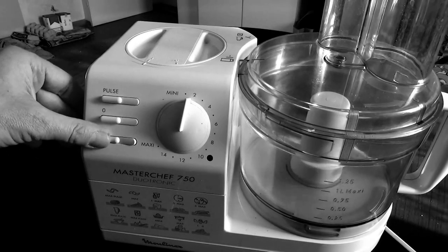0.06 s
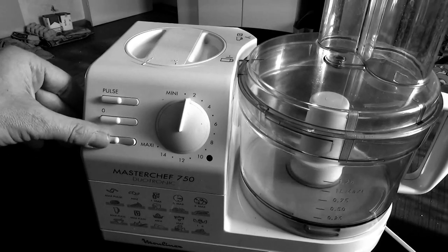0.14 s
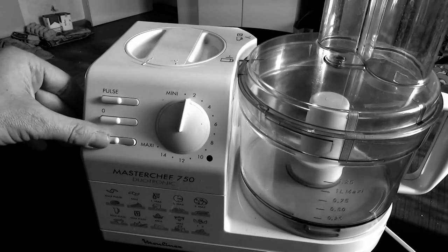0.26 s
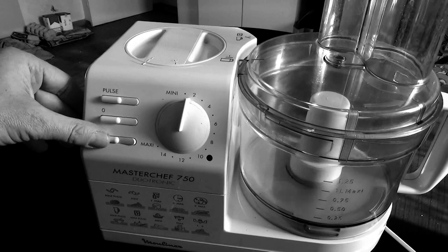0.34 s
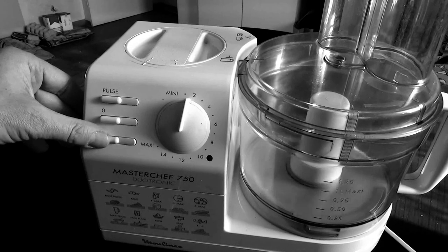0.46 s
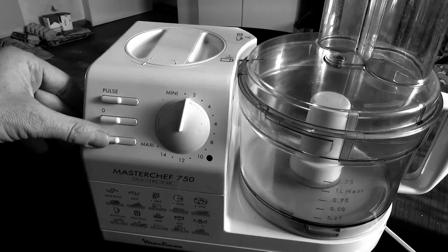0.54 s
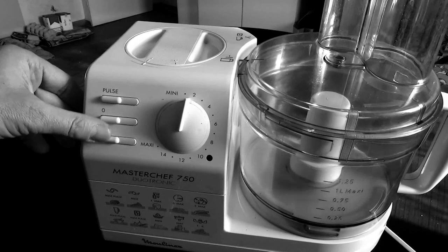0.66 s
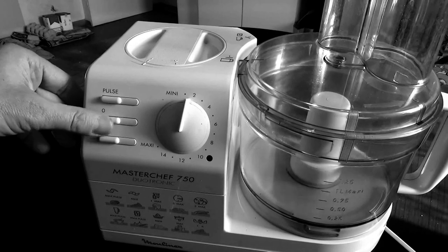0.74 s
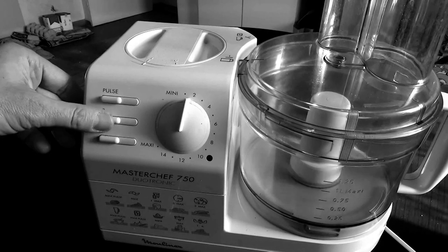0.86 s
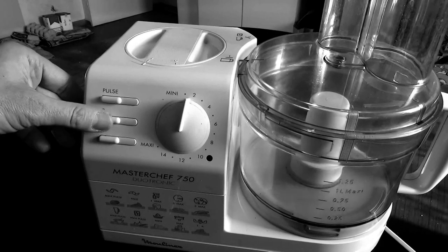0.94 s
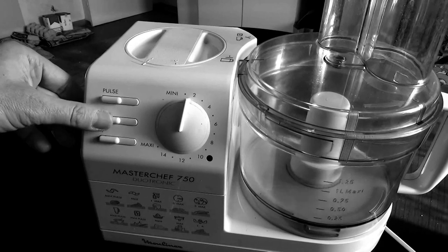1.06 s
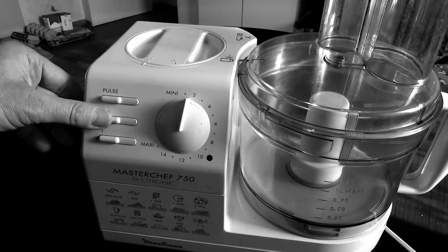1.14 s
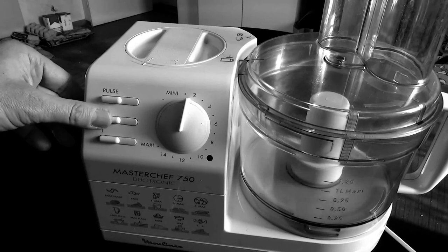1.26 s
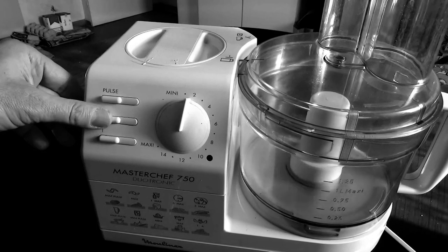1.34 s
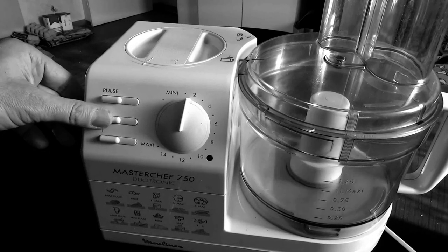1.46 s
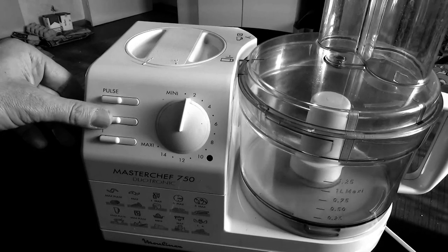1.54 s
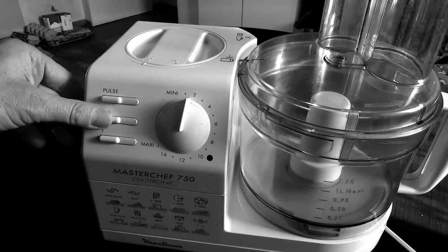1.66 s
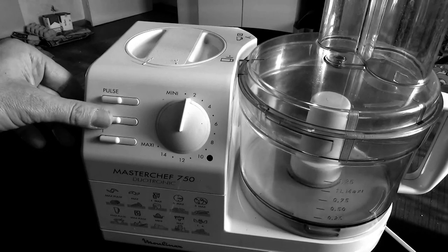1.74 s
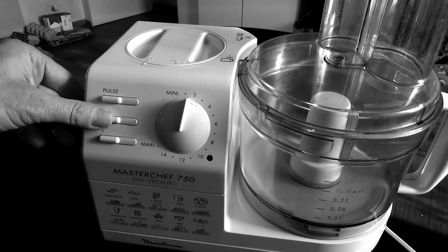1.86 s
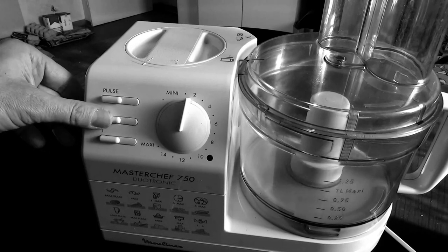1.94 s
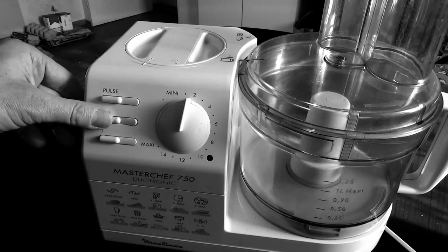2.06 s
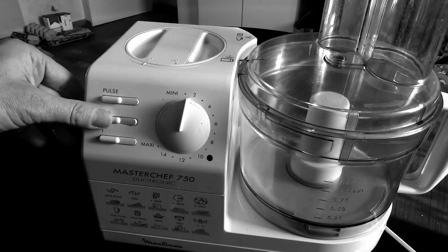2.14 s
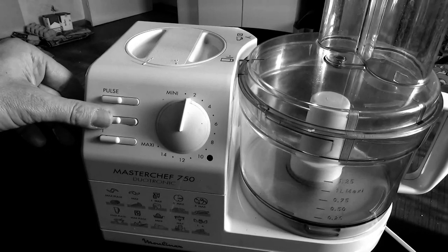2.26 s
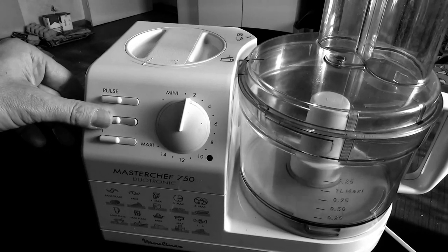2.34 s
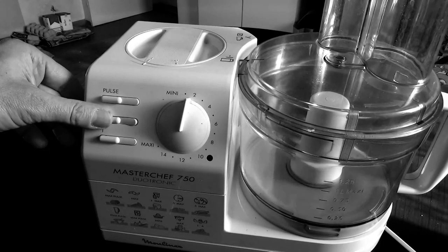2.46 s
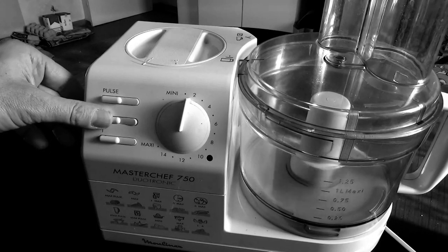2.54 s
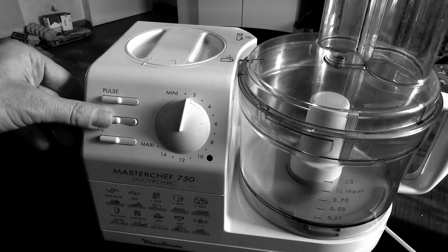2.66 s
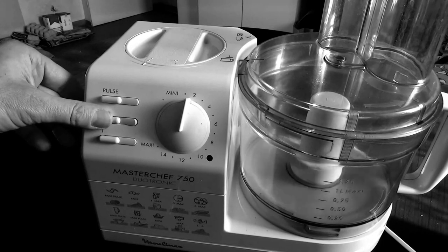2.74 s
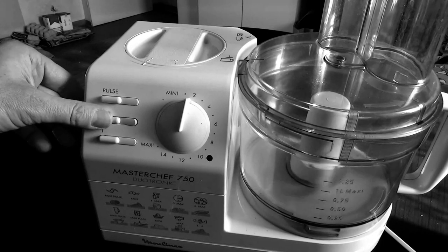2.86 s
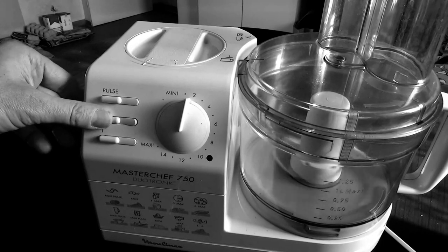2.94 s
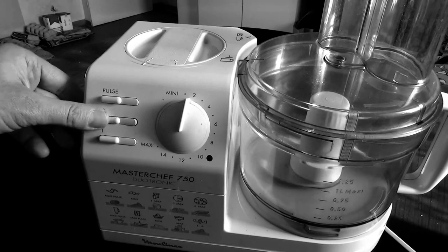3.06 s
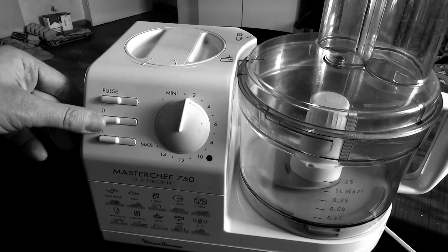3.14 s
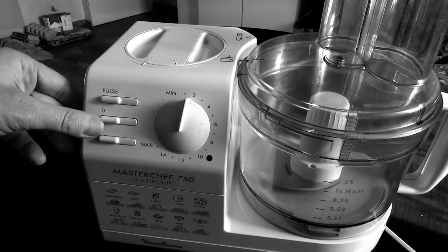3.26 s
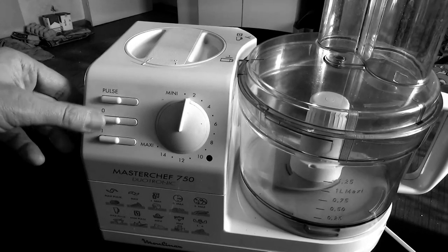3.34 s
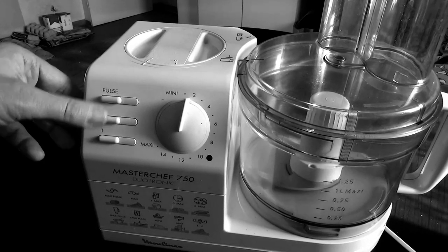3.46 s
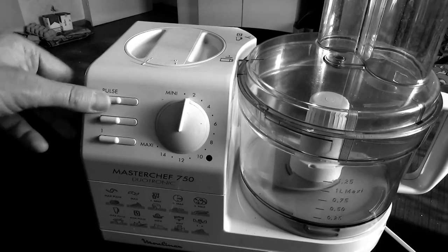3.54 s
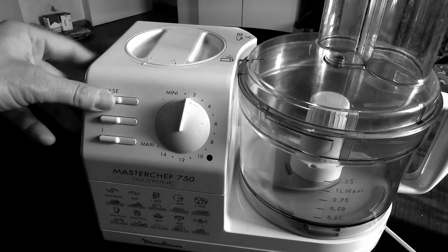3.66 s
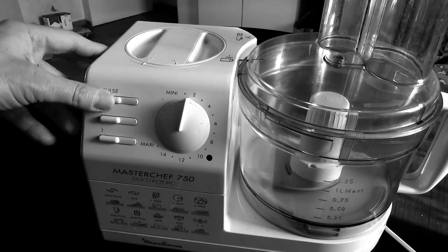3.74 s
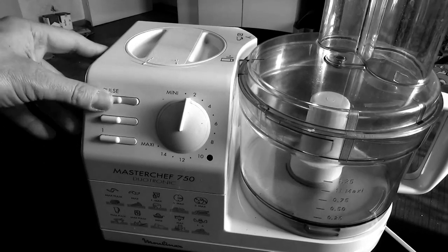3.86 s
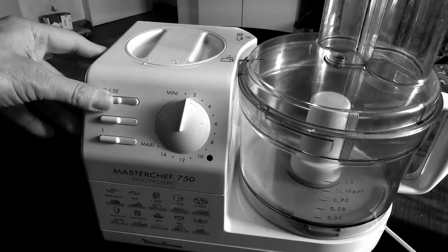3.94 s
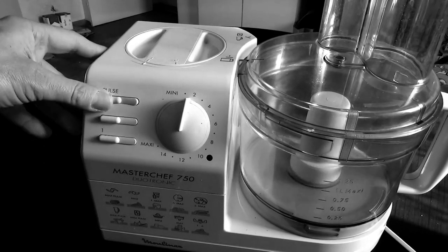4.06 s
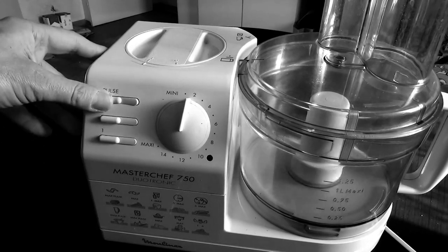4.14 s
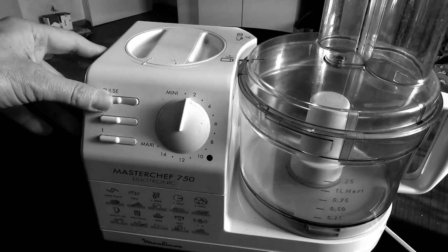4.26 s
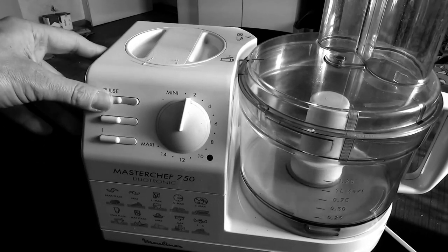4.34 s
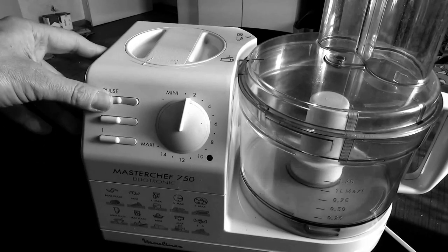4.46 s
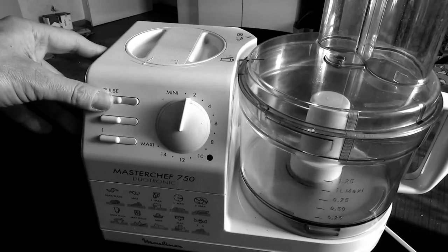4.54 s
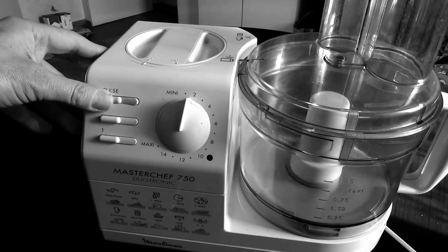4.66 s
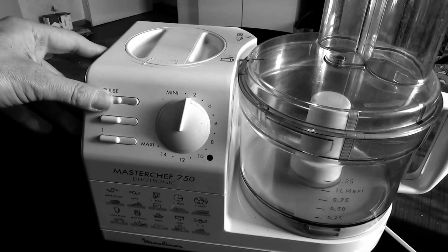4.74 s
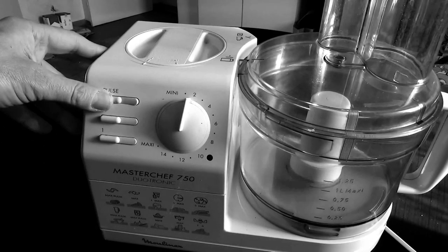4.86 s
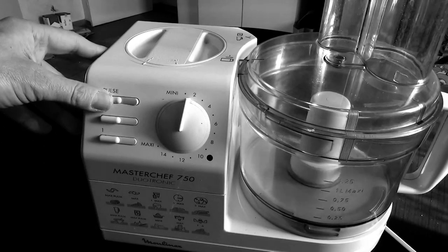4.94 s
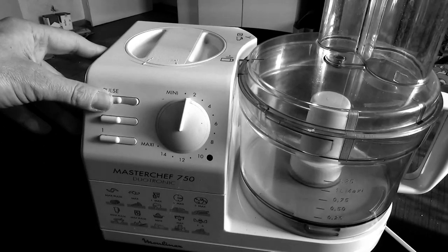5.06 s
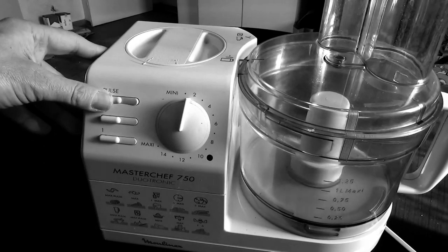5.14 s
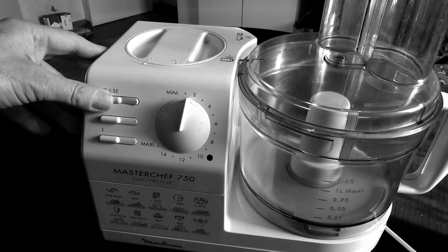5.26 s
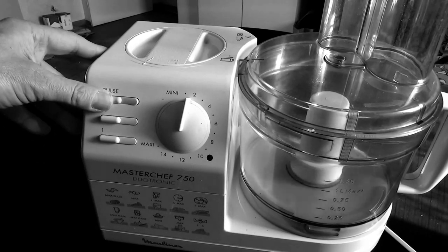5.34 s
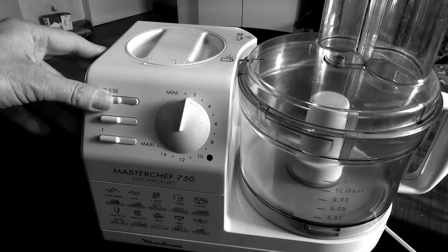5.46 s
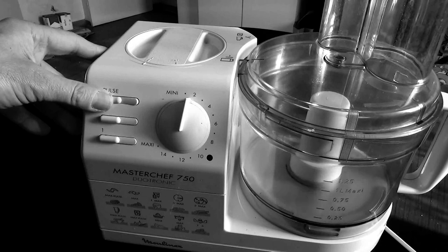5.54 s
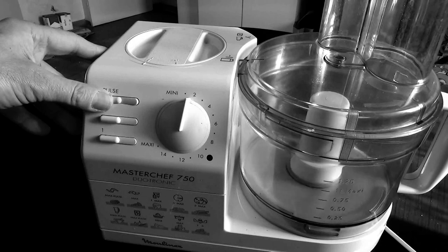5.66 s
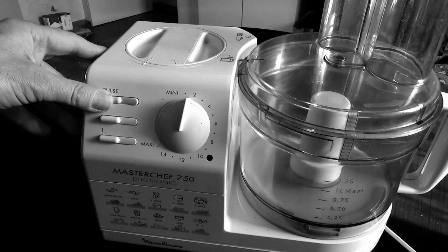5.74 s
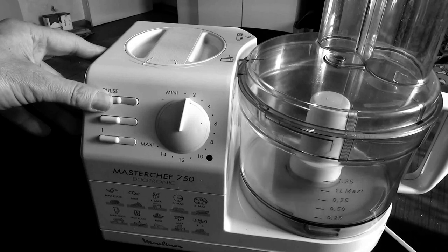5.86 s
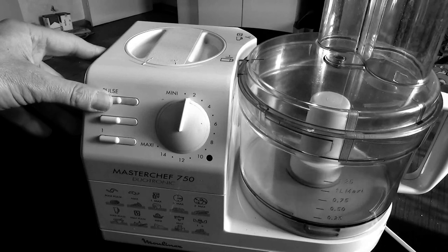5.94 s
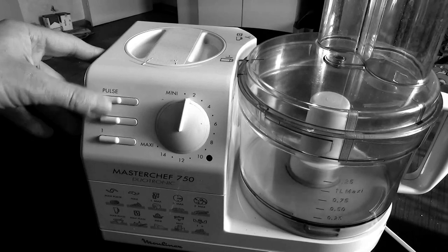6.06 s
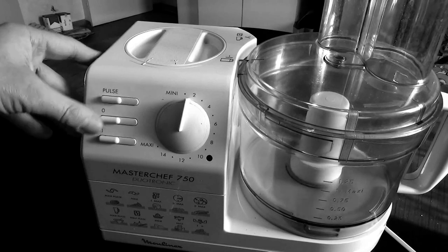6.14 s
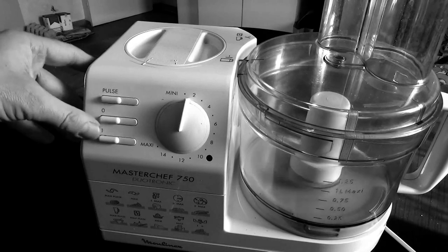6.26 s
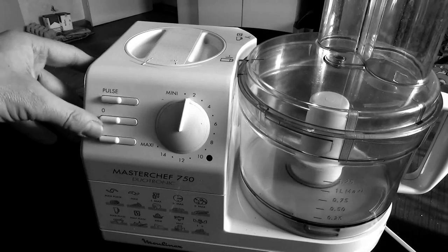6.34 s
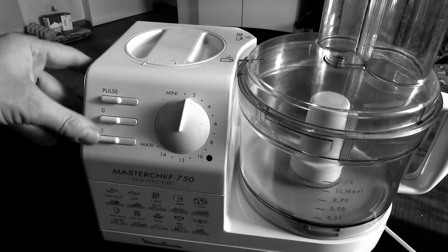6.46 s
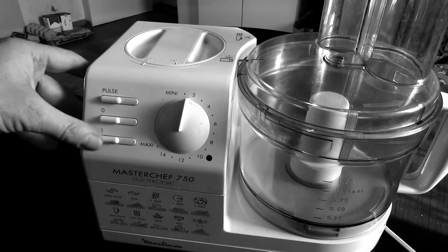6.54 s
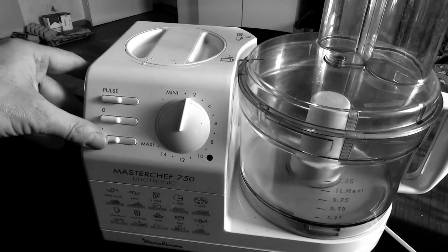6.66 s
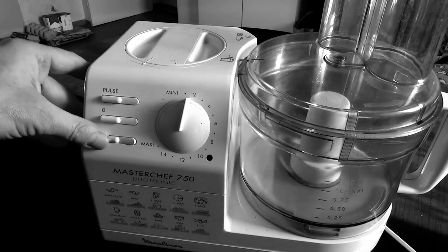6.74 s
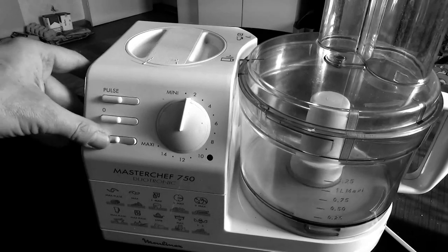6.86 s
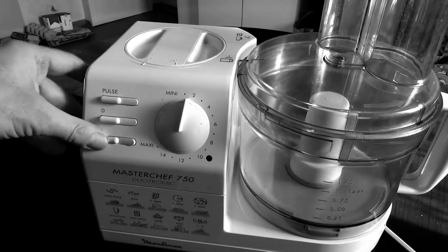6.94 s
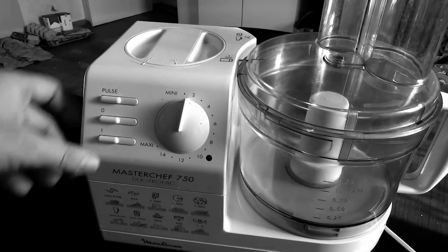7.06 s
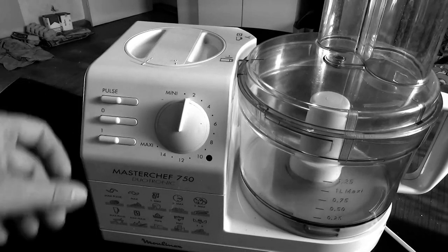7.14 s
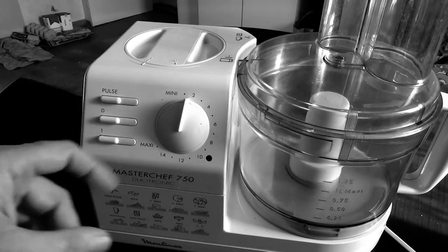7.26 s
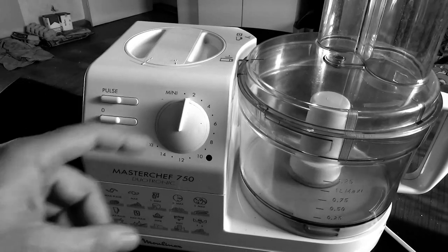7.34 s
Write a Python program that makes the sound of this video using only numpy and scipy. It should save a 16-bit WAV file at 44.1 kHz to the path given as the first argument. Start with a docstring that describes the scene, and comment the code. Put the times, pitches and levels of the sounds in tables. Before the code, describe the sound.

An empty food processor buzzes in three bursts, with switch clicks, clattering starts and a falling whine in between.

```python
"""On a kitchen counter, an empty food processor runs, is switched off and coasts to rest. A thumb
presses the button: it runs for two seconds, coasts briefly and is started again. Pulses of mains
current shake the plastic housing and rattle the drive, while the motor's carbon brushes hiss and
whine with the rotor (its spinning part). Every start slams the slack drive into a clatter;
without power the whine glides down. The switch snaps on and off."""
import sys
import numpy as np
from scipy import signal
from scipy.fft import rfft, irfft, next_fast_len
from scipy.io import wavfile
from scipy.ndimage import uniform_filter1d

SR = 44100
rng = np.random.default_rng(int(sys.argv[2]) if len(sys.argv) > 2 else 0)


def to_wav(sig):
    """Store sig (one row per channel, or 1-D mono) as 16-bit WAV at the path in sys.argv[1].

    Samples outside -1..1 are clipped; the rate is SR.
    """
    pcm = np.clip(np.atleast_2d(sig), -1, 1) * 32767
    pcm = np.round(pcm).astype(np.int16)
    wavfile.write(sys.argv[1], SR, pcm.T)  # frames by channels


N = 326340
TIME = np.arange(N) / SR
MAINS_HZ, FULL_TURNS_PER_S, COMMUTATOR_BARS = 50, 152.5, 18


def from_db(db):
    """Turn decibels into a gain to multiply by."""
    return 10 ** (np.asarray(db) / 20)


def rms_one(x):
    """Scale a signal to an average power of 1."""
    return x / np.sqrt(np.mean(x ** 2) + 1e-20)


def at_hz(spectrum, hz):
    """Read a spectrum between its points, on a scale of octaves."""
    f, db = np.transpose(spectrum)
    return np.interp(np.log(np.maximum(hz, 1)), np.log(f), db)


def drift(rate):
    """A smooth random wobble of size about 1 that changes about `rate` times a second."""
    pole = np.exp(-40 * np.pi * rate / SR)
    noise = rng.standard_normal(N // 20 + 4002)
    slow = signal.lfilter([1], [1, -2 * pole, pole * pole], noise)[4000:]
    return np.interp(np.arange(N) / 20, np.arange(len(slow)), rms_one(slow))


def response(spectrum, modes, hz):
    """Gain of a broad spectrum with peaks at its modes, the pitches where a part rings."""
    peaks = sum(from_db(db) ** 2 / (1 + (2 * (hz - f) / width) ** 2) ** 2 for f, width, db in modes)
    return from_db(at_hz(spectrum, hz)) * np.sqrt(1 + peaks)


def colour(x, spectrum, modes=()):
    """Give a sound the tone colour of a part; only the spectrum's shape counts, not its overall level."""
    size = 2 * next_fast_len(N // 2 + SR // 4)
    hz = np.arange(size // 2 + 1) * SR / size
    cepstrum = irfft(np.log(rms_one(response(spectrum, modes, hz))))
    # minimum phase: the ringing comes after each hit, never before
    cepstrum[1:size // 2] *= 2
    cepstrum[size // 2 + 1:] = 0
    return irfft(rfft(x, size) * np.exp(rfft(cepstrum)))[:N]


def impacts(per_s, spread_db):
    """Tiny random hits of uneven force."""
    force = from_db(spread_db * np.minimum(rng.exponential(1, N), 4)) * rng.choice([-1, 1], N)
    return rms_one(force * (rng.random(N) < per_s / SR))


def echoes(x, decay_s):
    """Dense echoes from counter and walls, about as strong as the sound itself."""
    age = TIME[:SR // 4]
    walls = rng.standard_normal(len(age)) * np.exp(-age / decay_s) * (age > .002)
    return signal.fftconvolve(x, walls / np.linalg.norm(walls))[:N]


# spells under power: on t/s, off t/s, extra jolt level/dB, extra brush rub level/dB when coasting
RUNS = [(-0.12, 2.133, 0, -1), (3.96, 6.011, 0.5, 1.8), (6.883, 7.5, -0.7, 0)]
def switch_state():
    """Seconds since switching on and off (zero under power), and that run's two extra levels."""
    runs = np.array(RUNS)
    latest = np.maximum(np.searchsorted(runs[:, 0], TIME, side="right") - 1, 0)
    on, off, jolt_db, rub_db = runs[latest].T
    return np.maximum(TIME - on, 0), np.maximum(TIME - off, 0), jolt_db, rub_db


def rotor_speed(spin_up_s=0.056, friction_turns_per_s2=100, drag_per_s=0.36):
    """Turns per second: power pulls the rotor up from the speed it has left; friction and drag slow it."""
    speed = np.zeros(N)
    friction = friction_turns_per_s2 / drag_per_s
    for on, off, *_ in RUNS:
        shortfall = FULL_TURNS_PER_S - speed[max(int(on * SR), 0)]
        driven = FULL_TURNS_PER_S - shortfall * np.exp(-np.clip(TIME - on, 0, off - on) / spin_up_s)
        slowed = (driven + friction) * np.exp(-drag_per_s * np.maximum(TIME - off, 0)) - friction
        speed = np.where(TIME >= on, np.maximum(slowed, .01), speed)
    return speed * (1 + 0.000802 * drift(4))


def mains_pulses(depth_db):
    """The speed control lets one pulse of current through in each mains cycle."""
    cycle = 2 * np.pi * MAINS_HZ * TIME
    return rms_one(from_db(depth_db * (np.cos(cycle) + 0.29 * np.cos(2 * cycle))))


def driven_gains(since_on, since_off, jolt_db, rise_s=0.0022, fall_s=0.013, recover_s=0.59, throb_hz=9.5):
    """Gains of rumble, rattle and sparks: the recorder's gain ducks at each loud start, then recovers."""
    gate = np.minimum(since_on / rise_s, 1) * np.exp(-since_off / fall_s)
    jolt = np.exp(-((since_on - 0.026) / 0.13) ** 2)
    # the housing takes a moment to get moving, then heaves once
    moving = 1 - np.exp(-since_on / 0.0086)
    heave = np.exp(-((since_on - 0.11) / 0.084) ** 2)
    duck = np.exp(-since_on / recover_s)   # a set curve, timed from the switch
    unsteady_db = 0.8 * drift(2.9)
    throb_db = 1.6 * np.sin(2 * np.pi * throb_hz * TIME + 2 * drift(2.23))
    rumble = from_db(-15 - 4 * duck + (6.5 + jolt_db) * heave + throb_db) * moving
    rattle = from_db(-20 - 6 * duck + (11.5 + jolt_db) * jolt + unsteady_db)
    sparking = from_db(-23.5 - 8 * duck + (4 + jolt_db) * jolt + unsteady_db / 2)
    return gate * rumble, gate * rattle, gate * sparking


# steady mains tones and looser drive tones: f/Hz, relative level/dB, phase wander/rad
BUZZ_TONES = [(72, -37.5, 1), (100, -20.5, 0.4), (150.5, -20.5, 0.33), (216, -6.5, 1.83), (248.6, -4, 0.4),
              (272, -8, 2), (299.7, -5.5, 0.4), (350.2, -15.5, 0.5), (371.8, -13, 0.7), (452, -17, 0.43),
              (501.8, -18, 0.81), (570, -16.5, 1.5)]
# the boom of the housing: f/Hz, level/dB
HOUSING_SPECTRUM = [(25, -62), (60, -50.5), (90, -26), (135, -20), (155, -10), (190, -14.5), (212, 4),
                    (255, 2), (295, 0.5), (325, -22.5), (370, -6), (420, -20.5), (700, -30.5), (2000, -79)]
def housing(waver_db=1.1):
    """The shaken housing booms at 200-300 Hz; its buzz wavers with the slack drive."""
    buzz = 0
    for hz, db, wander in BUZZ_TONES:
        gain = from_db(db + waver_db * drift(12.5))
        buzz += gain * np.sin(2 * np.pi * hz * TIME + wander * drift(6.85))
    thumps = impacts(per_s=500, spread_db=2) * mains_pulses(depth_db=6)
    return from_db(-0.73) * buzz + from_db(-3) * colour(thumps, HOUSING_SPECTRUM)


# the housing lurching on its feet: f/Hz, level/dB
LURCH_SPECTRUM = [(25, -48), (60, -34), (110, -33.5), (155, 9.5), (195, -5), (260, 6), (600, -39)]
def lurch(strain):
    """The rotor kicks back as it speeds up, knocking the housing against the counter."""
    knocking = colour(impacts(per_s=500, spread_db=0), LURCH_SPECTRUM)
    return from_db(-8.5) * np.minimum(strain * 12, 1) * knocking


# the drive's running chatter: f/Hz, level/dB
CHATTER_SPECTRUM = [(200, -40.5), (400, -2), (500, 0.5), (600, 1), (720, 2.5), (800, -7), (950, -0.5),
                    (1220, -1.5), (1350, -8.5), (1800, -11.5), (2400, -11.5), (3300, -16.5), (7000, -23.5),
                    (15000, -40)]
# its starting clatter: f/Hz, level/dB
CLATTER_SPECTRUM = [(30, -50), (200, -27), (400, 7), (650, -3.5), (900, 2), (1400, -6), (2400, -6.5),
                    (3700, -9), (5000, -22), (8500, -12), (15000, -50.5)]
# ringing of the bowl and lid: f/Hz, width/Hz, level/dB
BOWL_MODES = [(508, 66, 2), (585, 25, -0.5), (849, 59, 2), (970, 42, -2.5), (1215, 17, 3), (1570, 150, 2.5),
              (2130, 150, -3), (2375, 70, 5)]
def drive_rattle(strain):
    """The loose spindle chatters with every pulse of current, and slams while it speeds up."""
    chatter = impacts(per_s=2800, spread_db=2) * mains_pulses(depth_db=1.5) * from_db(0.67 * drift(30))
    blows = impacts(per_s=900, spread_db=0.5)
    running = colour(np.sqrt(1 - strain) * chatter, CHATTER_SPECTRUM, BOWL_MODES)
    starting = colour(np.sqrt(strain) * blows, CLATTER_SPECTRUM)
    return from_db(-0.76) * (running + starting)


# the hiss of the brushes: f/Hz, level/dB
HISS_SPECTRUM = [(500, -27.5), (1500, 7.5), (3000, -2), (4100, 2.5), (4800, 0.5), (5700, 2.5), (7500, 2.5),
                 (10000, 1.5), (12200, -4), (12800, -5), (13500, -6), (14400, -10), (15300, -8),
                 (16000, -10)]
# ringing of the brush holders: f/Hz, width/Hz, level/dB
BRUSH_MODES = [(5600, 140, -0.5), (6110, 610, 2), (6725, 310, 7), (8220, 130, 3.5), (9000, 250, 2),
               (9630, 130, -2), (10500, 220, 1), (10920, 270, 5), (11820, 260, 7), (13600, 410, 13)]
def brushes(halvings, turns, sparking, rubbing, dull_hz=6230):
    """Carbon rubs and sparks on the commutator, the rotor's ring of contact bars; duller as it slows."""
    bars = 1 + 0.17 * np.cos(2 * np.pi * COMMUTATOR_BARS * turns)
    force = from_db(0.5) * rubbing + from_db(-0.15) * sparking * mains_pulses(depth_db=0.94)
    hiss = colour(impacts(per_s=16000, spread_db=1.5) * bars * force, HISS_SPECTRUM, BRUSH_MODES)
    dull = signal.sosfilt(signal.butter(1, dull_hz, fs=SR, output="sos"), hiss)
    brightness = np.exp(-.7 * halvings)
    return brightness * hiss + (1 - brightness) * from_db(4) * dull


# tones of the off-balance rotor, gear and commutator:
# cycles per turn, relative level/dB at full speed, loss/dB per halving of speed
ROTOR_TONES = [(1, -38, 4), (2, -38, 12), (7, -43, 2.5), (8, -35.5, 1), (9, -36.5, 4), (18, -42.5, 5),
               (27, -39.5, 6), (36, -41, 5.5), (45, -45, 9), (54, -36, 17), (63, -38, 13), (72, -41.5, 7.5),
               (81, -46, 10), (90, -47, 10), (99, -50, 7)]
# how strongly the housing gives off each pitch: f/Hz, level/dB
HOUSING_RESPONSE = [(30, -32), (70, -12), (170, 3.5), (270, 7), (340, 2.5), (440, -1.5), (600, 3), (780, 2),
                    (890, 7), (975, 14.5), (1090, 6.5), (1210, -0.5), (1500, 5.5), (1850, 1.5), (2130, 4),
                    (2380, -3.5), (2630, 6.5), (2800, -5.5), (3050, 6.5), (3220, -5), (3430, 1),
                    (4100, -0.5), (16000, -1.5)]
def whine(speed, halvings, turns, powered, strain, flutter_db=3):
    """Rotor tones, blurred by the motor's shaking, swell as they glide past pitches where parts ring."""
    shaken_turns = turns + 0.0042 * (1 / 8 + powered) * drift(14.7)
    # the commutator falls silent before the gear does
    commutator_gain = np.clip((speed - 22) / 36, 0, 1)
    gear_gain = np.clip((speed - 10) / 16, 0, 1) ** 2
    slack_turns = 0.013 * speed / FULL_TURNS_PER_S
    tones = 0
    for multiple, db, loss_db in ROTOR_TONES:
        gain = from_db(db - loss_db * halvings + flutter_db * drift(30))
        gain *= response(HOUSING_RESPONSE, BOWL_MODES, multiple * speed)
        cycles = multiple * shaken_turns + 0.082 * (1 / 2 + powered) * drift(18.7)
        if multiple < COMMUTATOR_BARS:
            cycles += multiple * slack_turns * drift(50)   # slack between gear teeth roughens the tone
            gain *= gear_gain
        else:
            gain *= commutator_gain
        tones += gain * np.sin(2 * np.pi * cycles)
    tones += from_db(-3) * echoes(tones, decay_s=0.033)
    # softer under power, and softer still until the motor is up to speed
    return from_db(powered * (-3 - 7.3 * np.minimum(strain * 25, 1))) * tones


# the kitchen's hum: f/Hz, relative level/dB
HUM_TONES = [(231.5, -60), (1028, -70), (1157, -63.5), (1416, -72.5)]
# the kitchen's noise: f/Hz, level/dB
ROOM_SPECTRUM = [(18, -53), (30, -28), (129, -9), (234, -7), (552, -19), (905, -20), (1140, -21),
                 (1560, -25), (1870, -26), (4780, -32), (15000, -31)]
def quiet_kitchen():
    """Soft noise and a faint hum lie under everything."""
    hum = sum(from_db(db + 1.5 * drift(5)) * np.sin(2 * np.pi * hz * TIME) for hz, db in HUM_TONES)
    return from_db(-44 - 11) * colour(rng.standard_normal(N), ROOM_SPECTRUM) + from_db(1) * hum


def coasting_gains(since_off, halvings, rub_db, rise_s=0.028):
    """Strength of bearings and brushes with the power off; both fade as the rotor slows."""
    gate = np.minimum(since_off / rise_s, 1)
    rolling = gate * from_db(-20.5 - 6.5 * halvings)
    rubbing = gate * from_db(-28.5 + rub_db - 5.5 * halvings)
    return rolling, rubbing


# the coasting drive: f/Hz, level/dB
BEARING_SPECTRUM = [(25, -74), (80, -19.5), (150, -11.5), (240, 6), (330, -9.5), (600, -12), (780, -18),
                    (1000, -9.5), (1400, -24), (2200, -24.5), (3500, -31.5), (8000, -41)]
def bearings():
    """The free-running drive rolls and ticks inside the housing."""
    ticks = impacts(per_s=1500, spread_db=3) * from_db(drift(22))
    return from_db(-0.5) * colour(ticks, BEARING_SPECTRUM, BOWL_MODES)


def hits(rows, spectrum, modes, crack_db, tail_db, tail_s):
    """Hits on plastic: a crack, a brief chatter and the room's tail. Fade times are for a 60 dB drop."""
    envelope, cracks = np.zeros((2, N))
    for s, db, fade_s in rows:
        start = round(s * SR)
        age = TIME[:N - start]
        envelope[start:] += from_db(db - 60 * age / fade_s) + from_db(db + tail_db - 60 * age / tail_s)
        cracks[start] = from_db(db + crack_db)
    return colour(cracks + envelope * impacts(per_s=12000, spread_db=0.5), spectrum, modes)


# switch snaps and button ticks: t/s, level/dB, fade/s
SNAPS = [(2.138, -6.5, 0.02), (3.7095, -35, 0.012), (3.949, -20, 0.01), (3.965, -14.5, 0.033),
         (6.8648, -7.5, 0.028)]
# their tone colour: f/Hz, level/dB
SNAP_SPECTRUM = [(30, -50), (200, -6), (1200, -16), (2800, -14), (3700, -9.5), (4800, -11.5), (6200, -0.5),
                 (7100, -6), (7800, -6), (9200, -6.5), (10300, -15), (11500, -11), (13000, -10.5),
                 (16000, -21)]
# their ringing: f/Hz, width/Hz, level/dB
SNAP_MODES = [(6670, 330, 3.5), (7660, 300, -6), (9300, 250, -5)]
def switch_snaps():
    """The plastic switch snaps over with a bright click."""
    return hits(SNAPS, SNAP_SPECTRUM, SNAP_MODES, crack_db=-9, tail_db=-20.5, tail_s=0.4)


# low booms of the housing: t/s, level/dB
BOOMS = [(2.955, -28), (3.03, -30), (3.36, -41), (3.595, -44.5), (3.76, -43), (3.85, -37), (3.895, -32)]
def housing_booms(rise_s=0.008, fade_s=0.27):
    """Low booms, timed to the falling gear tone passing the housing's resonance, then to the thumb."""
    envelope = 0
    for s, db in BOOMS:
        age = np.maximum(TIME - s, 0)
        envelope += np.minimum(age / rise_s, 1) * from_db(db - 60 * age / fade_s)
    return colour(envelope * rng.standard_normal(N), HOUSING_SPECTRUM)


# thumb and button knocks: t/s, level/dB, fade/s
KNOCKS = [(3.2592, -24.5, 0.04), (3.709, -35, 0.06), (3.728, -45, 0.048), (3.848, -35, .035),
          (3.905, -37, 0.043), (3.921, -37, 0.017), (3.936, -34, 0.036)]
# their tone colour: f/Hz, level/dB
KNOCK_SPECTRUM = [(60, -20), (220, -3), (480, -15), (720, -16), (880, -3), (1500, 0), (2050, 2), (3300, 3),
                  (4700, -13), (6000, -2), (7200, -18), (8400, -16), (10000, -30), (16000, -39)]
# their ringing: f/Hz, width/Hz, level/dB
KNOCK_MODES = [(840, 88, 18), (1048, 17, 16), (1385, 40, 11), (1925, 60, 10)]
def button_knocks():
    """Thumb and button knock on the plastic, which rings briefly."""
    return hits(KNOCKS, KNOCK_SPECTRUM, KNOCK_MODES, crack_db=11, tail_db=-18.5, tail_s=0.34)


# skin rubbing on plastic: f/Hz, level/dB
SLIDE_SPECTRUM = [(30, -40), (300, 1), (1200, 6), (3000, -8), (5100, -15), (5700, 1), (6600, -1),
                  (7200, -4), (8100, -1), (9500, -8), (16000, -13)]
def thumb_slide(start_s=3.68, end_s=3.95, fade_s=0.017):
    """The thumb rubs faintly over the button before pressing it home."""
    envelope = np.clip(np.minimum(TIME - start_s, end_s - TIME) / fade_s, 0, 1)
    return from_db(-50.5) * colour(envelope * impacts(per_s=3900, spread_db=4), SLIDE_SPECTRUM)


# landings of the thumb: t/s, level/dB, fade/s
THUDS = [(3.714, -40, 0.2), (3.848, -31.5, 0.05), (3.897, -39.5, 0.15)]
# their tone colour: f/Hz, level/dB
THUD_SPECTRUM = [(30, -45), (100, -26), (420, -17), (530, 0), (850, 1), (1150, -2), (1400, -9), (1700, -4),
                 (3000, -26), (8000, -45)]
def thumb_thuds():
    """The soft pad of the thumb lands on the panel with a dull thud."""
    return hits(THUDS, THUD_SPECTRUM, (), crack_db=0, tail_db=-12, tail_s=0.41)


# echoes against the direct sound: f/Hz, relative level/dB
STEREO_WIDTH = [(30, -19), (80, -7), (180, -26), (350, -14.5), (700, -12), (1400, -16.5), (2800, -11.5),
                (4500, -95), (6500, -28.5), (8300, -9.5), (10000, -10), (12000, -31), (16000, -66)]
# left against right: f/Hz, level/dB
STEREO_LEAN = [(80, -2.5), (160, -0.5), (215, 0), (280, 1.2), (400, -2), (650, -0.5), (1000, 2.7),
               (1400, -2), (2800, 0.1), (5000, -2.5), (16000, 0)]
def stereo(x):
    """Left and right hear nearly the same; wall echoes and a slight lean set them apart."""
    size = next_fast_len(N + SR // 2)
    hz = np.arange(size // 2 + 1) * SR / size
    mid = rfft(x, size)
    side = rfft(echoes(x, decay_s=0.007), size) * from_db(at_hz(STEREO_WIDTH, hz) - 2.5)
    lean = from_db(at_hz(STEREO_LEAN, hz) / 2)
    return irfft(np.array([mid * lean + side, mid / lean - side]), size)[:, :N]


def scene():
    """The switch and the rotor's speed steer the motor sounds; clicks, bumps and the room join them."""
    since_on, since_off, jolt_db, rub_db = switch_state()
    speed = rotor_speed()
    turns = np.cumsum(speed) / SR
    halvings = np.log2(FULL_TURNS_PER_S / speed)   # 0 at full speed, 1 at half, 2 at a quarter
    strain = np.clip(1 - speed / FULL_TURNS_PER_S, 0, 1)   # a slow motor pulls hardest
    powered = uniform_filter1d((since_off == 0) * 1., size=400)
    rumble, rattle, sparking = driven_gains(since_on, since_off, jolt_db)
    rolling, rubbing = coasting_gains(since_off, halvings, rub_db)
    motor = rumble * (housing() + lurch(strain)) + rattle * drive_rattle(strain)
    motor += brushes(halvings, turns, sparking, rubbing) + rolling * bearings()
    motor += whine(speed, halvings, turns, powered, strain)
    short_sounds = switch_snaps() + button_knocks() + thumb_thuds() + housing_booms() + thumb_slide()
    return stereo(motor + short_sounds + quiet_kitchen())


def record(dry):
    """Round off the tallest peaks and cut the highest treble."""
    rounded = dry / (1 + dry ** 8) ** (1 / 8)
    return signal.sosfilt(signal.ellip(12, .1, 80, 15850, fs=SR, output="sos"), rounded)


dry = scene()
out = record(dry)
to_wav(out)
```